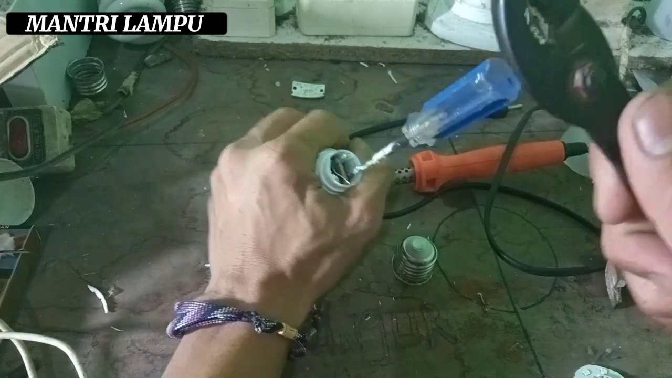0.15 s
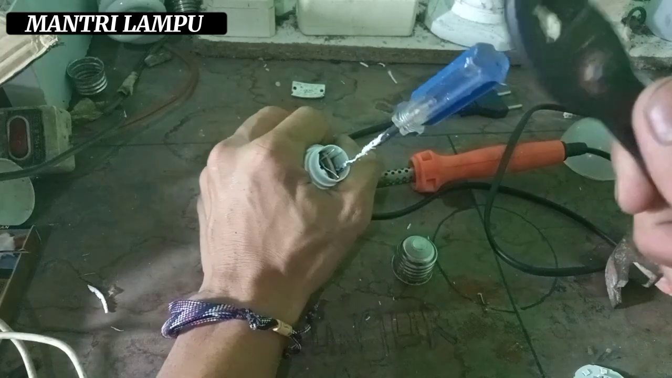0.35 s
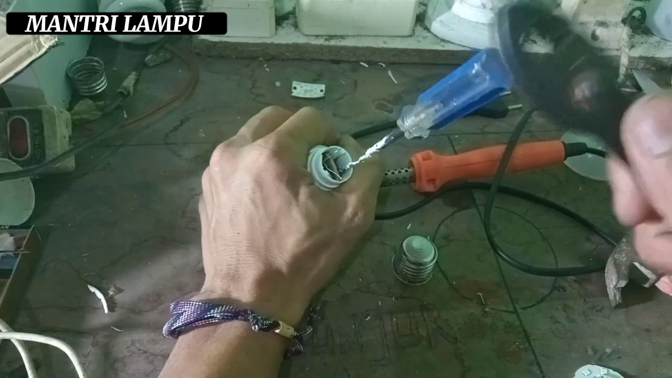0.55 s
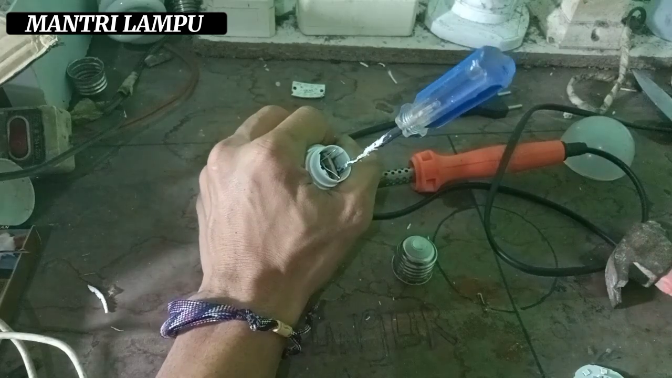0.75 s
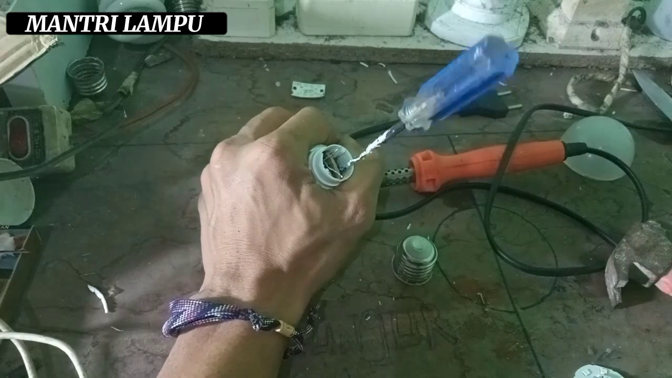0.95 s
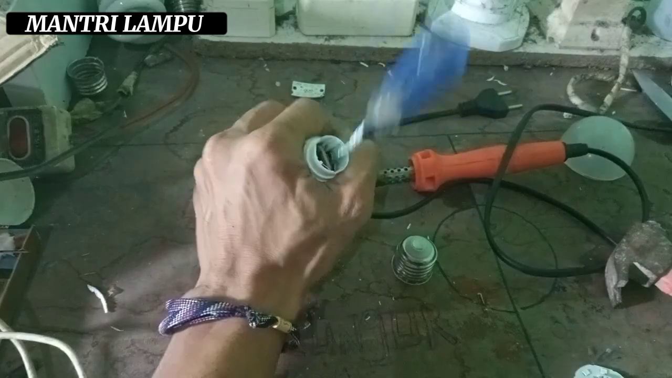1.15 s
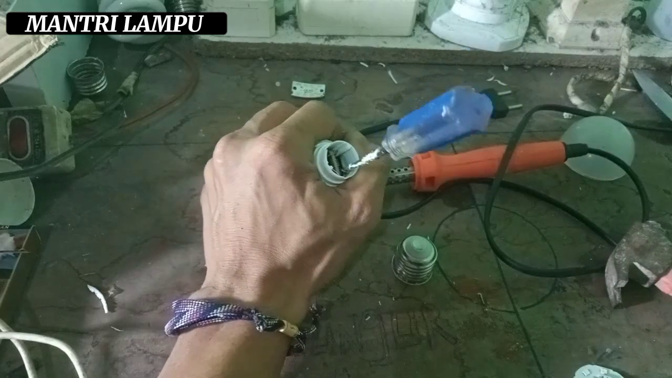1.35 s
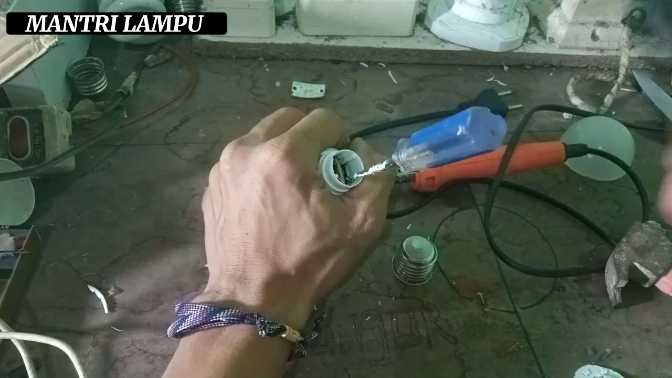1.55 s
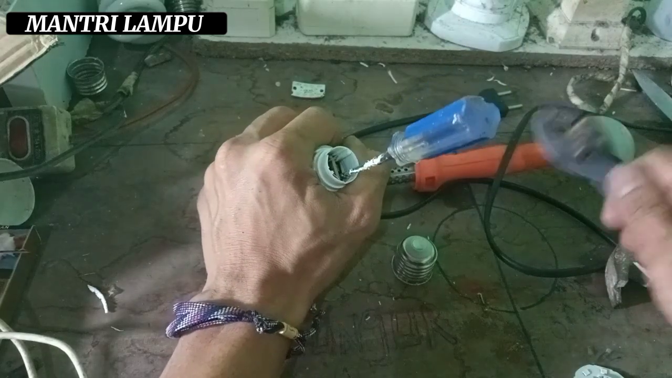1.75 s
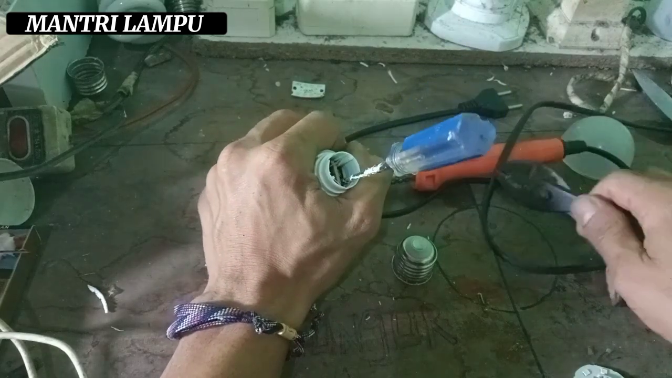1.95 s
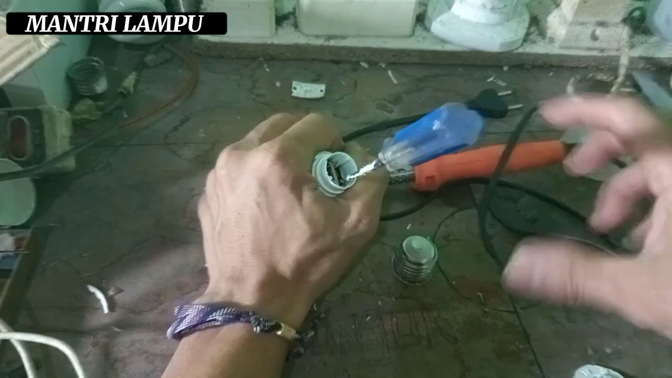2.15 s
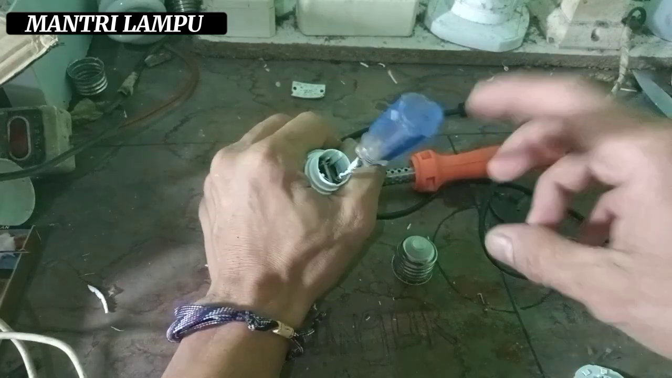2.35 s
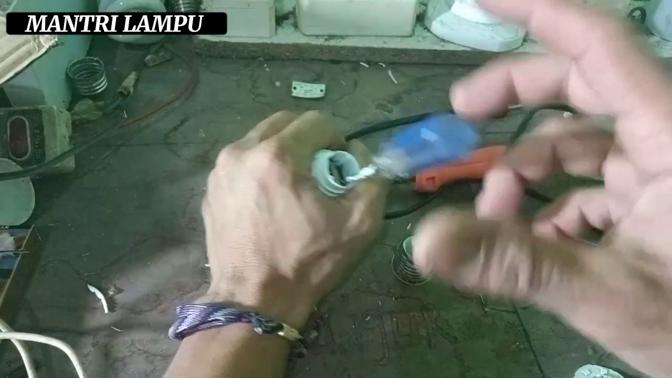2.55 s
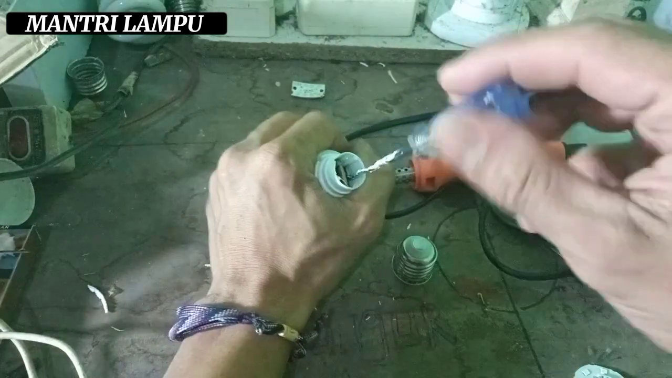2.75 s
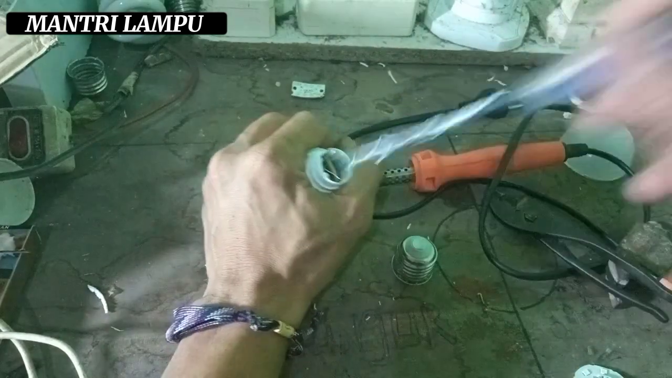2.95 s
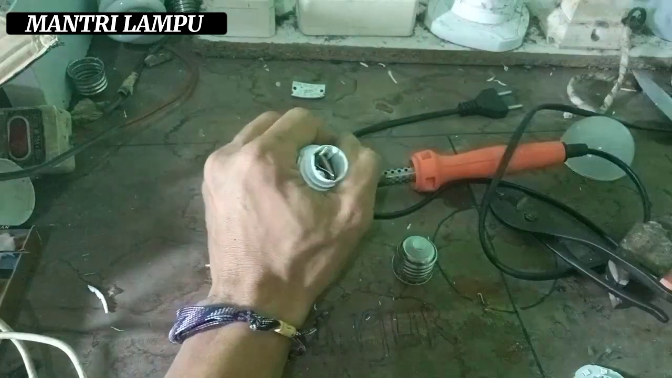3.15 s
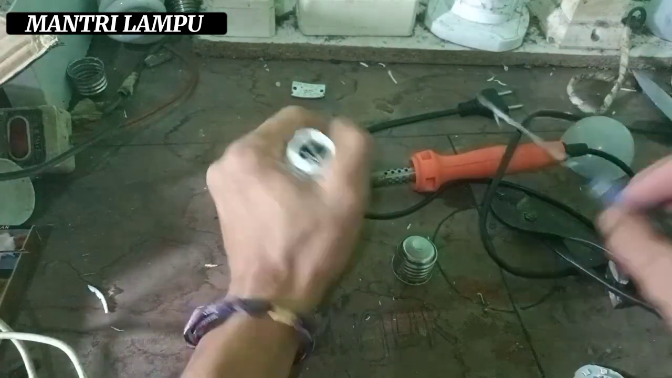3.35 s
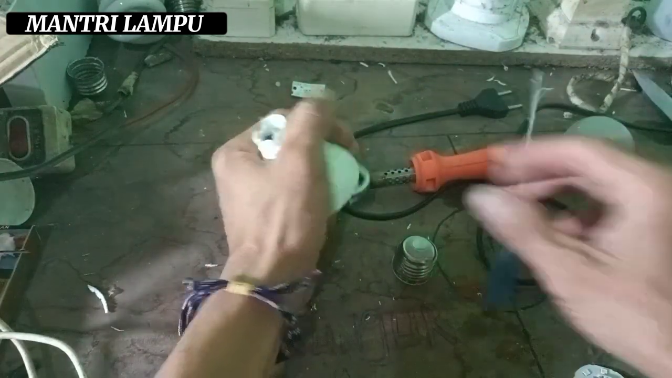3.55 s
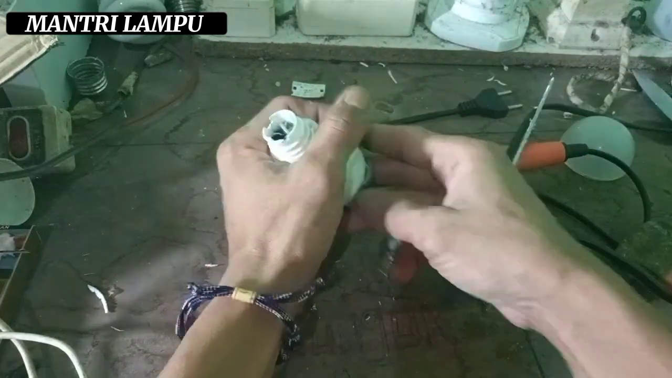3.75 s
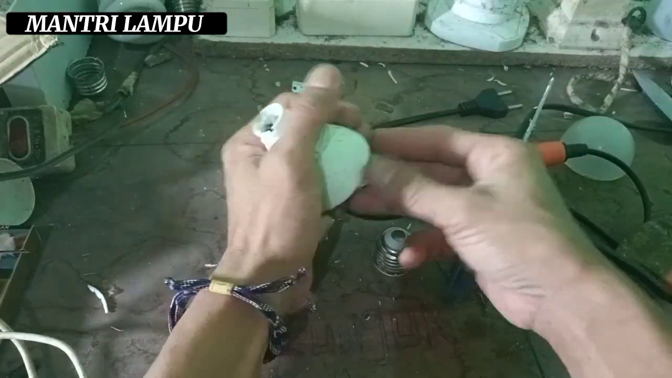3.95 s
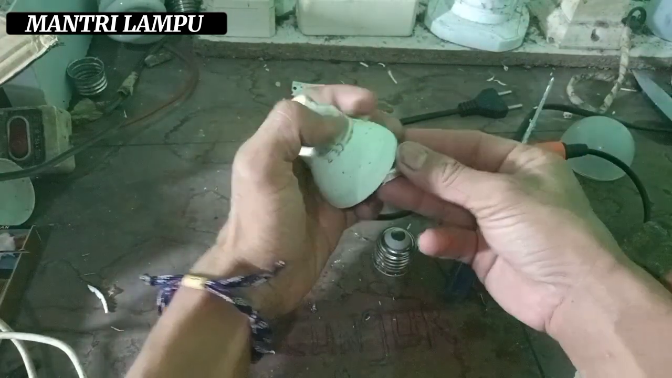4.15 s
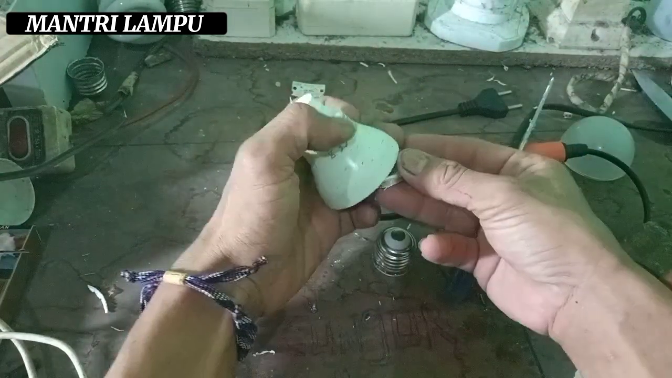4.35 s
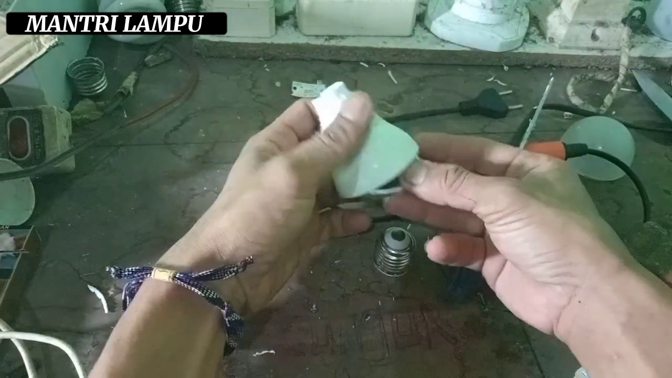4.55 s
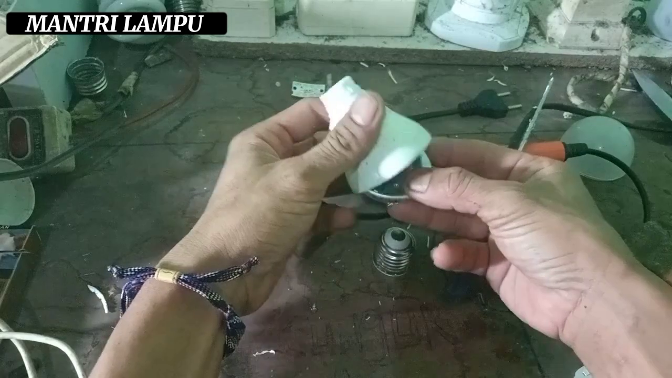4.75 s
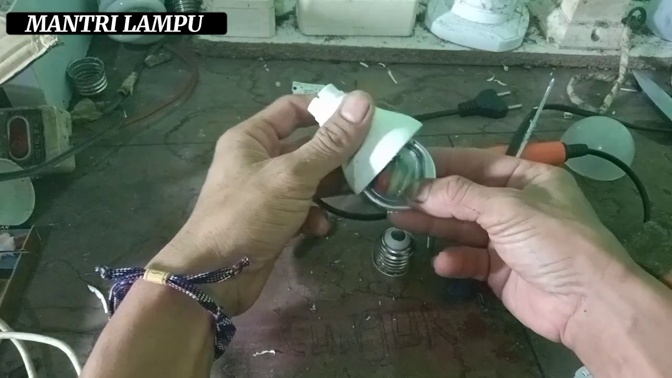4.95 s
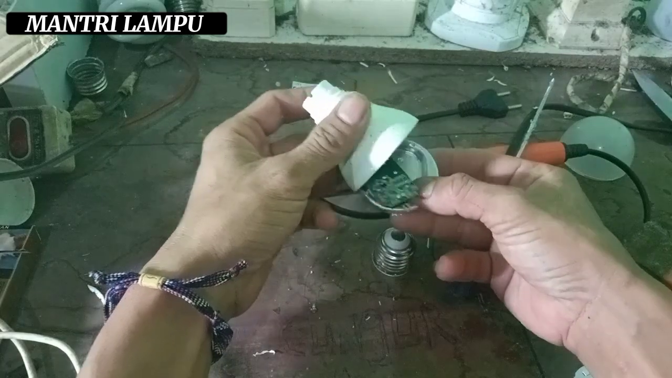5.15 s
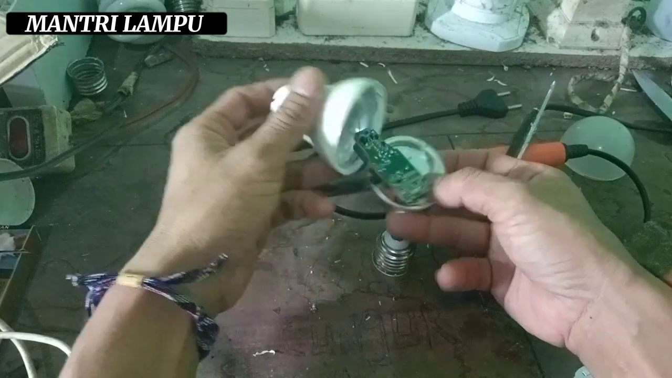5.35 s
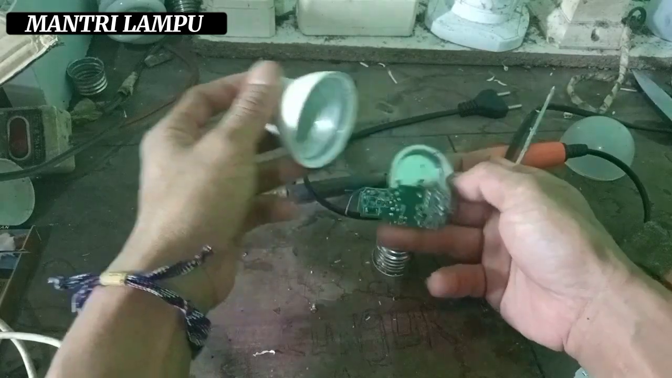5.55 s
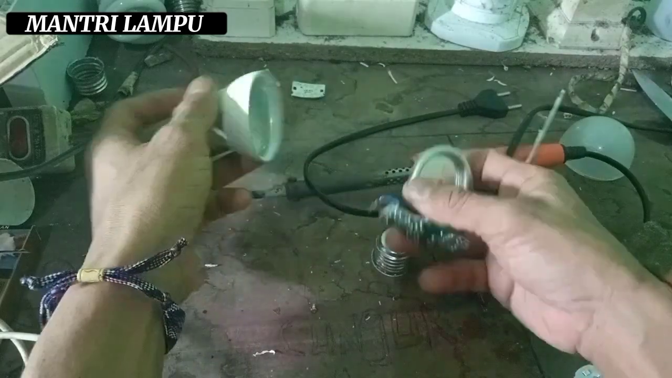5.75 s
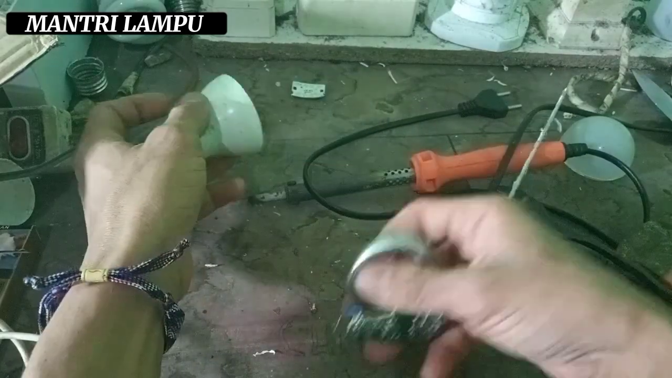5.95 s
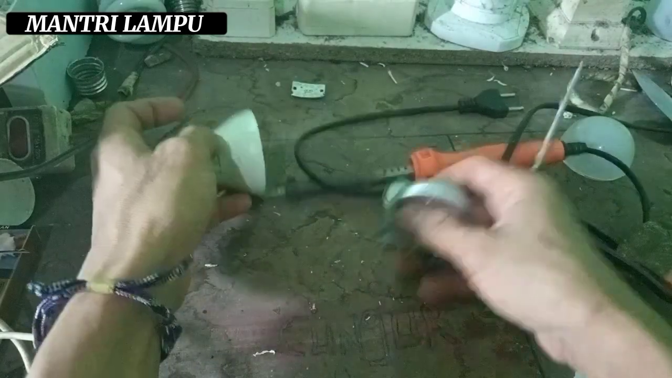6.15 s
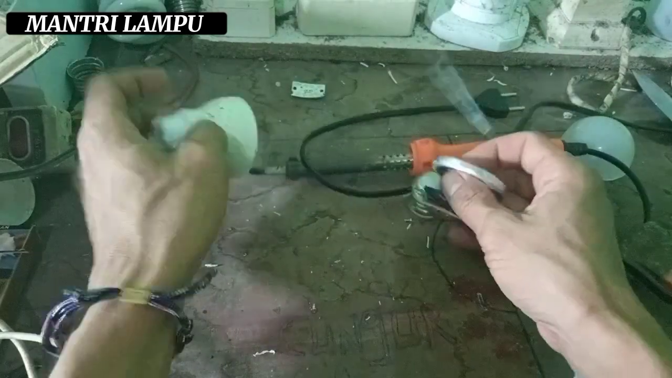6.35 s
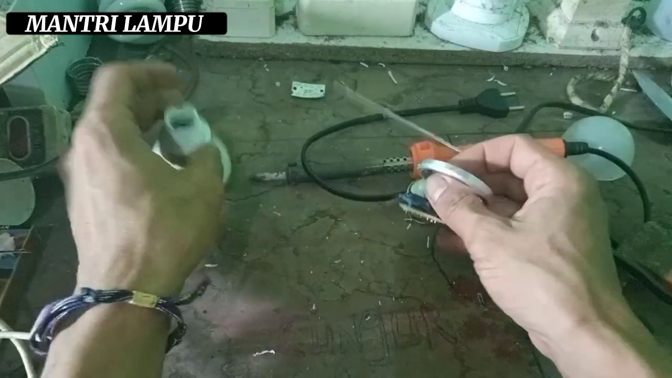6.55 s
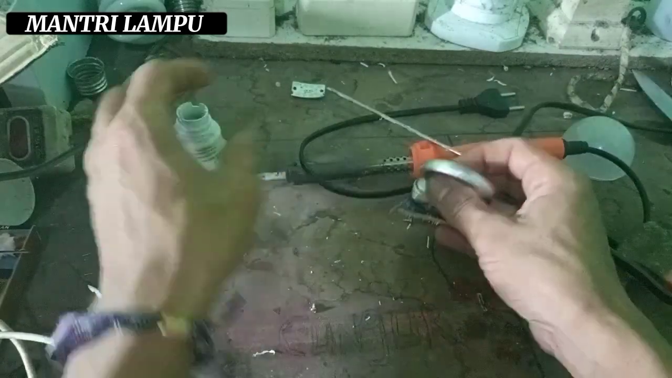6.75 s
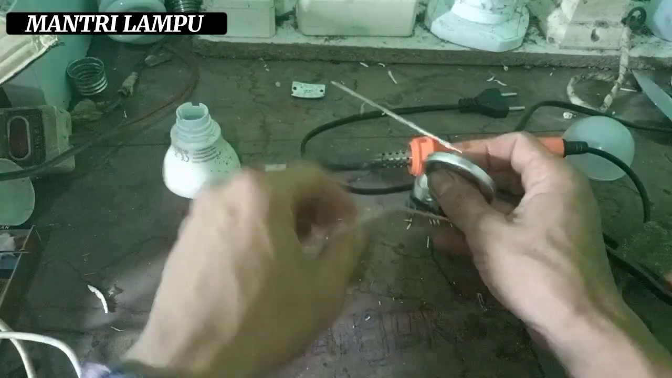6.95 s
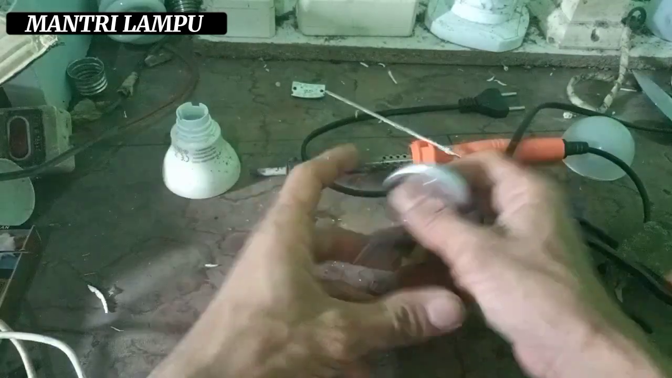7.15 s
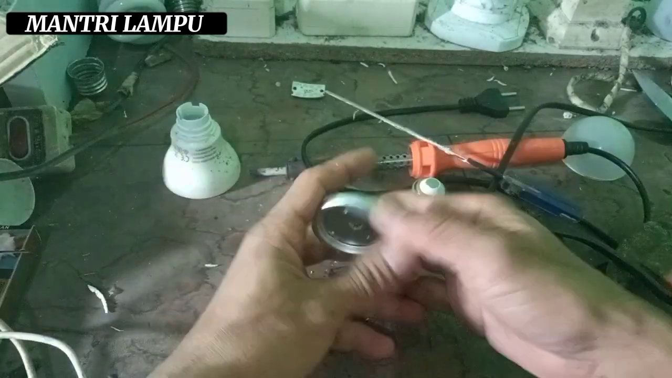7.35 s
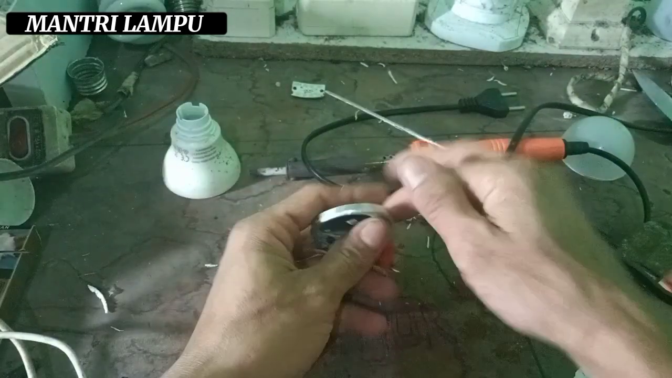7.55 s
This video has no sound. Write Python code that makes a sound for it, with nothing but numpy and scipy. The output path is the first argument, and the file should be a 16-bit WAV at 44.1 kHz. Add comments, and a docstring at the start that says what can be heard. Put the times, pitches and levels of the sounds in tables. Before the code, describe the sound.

A quiet room holds a wavering low hum, soft patchy noise and very faint high insects throbbing about eight times a second. A light metallic tap comes at 0.6 seconds, then a very hard, dull, dry double knock at 1.05. After a pause, a bench thump at 2.0 leads into loud, bright pliers clatter until 2.25. From 2.7 to 3.05 a screwdriver leaves the cap with faint scratchy ticks. Between 3.4 and 3.8 tools clatter and slide on wood, ending in a singing shaft. Small plate clicks and rubs run 4.1 to 5.6, brightest near 5.05. From 5.75 parts knock, roll and clink; shell clacks peak loudest at 6.6, with sliding, easing by 7.1. Tiny board taps finish from 7.3 to 7.5. Close, bright microphone, short room echo.

```python
"""A wooden workbench in a room: a lamp is taken apart. A screwdriver is knocked into the cap and pulled out, pliers
and screwdriver are dropped, an aluminium plate is pried from the plastic shell, parts are slid and set down.
Each blow is a short crackle of noise plus ringing sines; slides are showers of tiny clicks. Filtered noise makes
a wavering hum, room noise, throbbing insects and a faint tone. A limiter ducks before the hardest blows."""
import sys
import numpy as np
from scipy import signal
from scipy.io import wavfile
from scipy.ndimage import uniform_filter1d, minimum_filter1d

SR = 44100
rng = np.random.default_rng(int(sys.argv[2]) if len(sys.argv) > 2 else 0)


def log_audio(samples):
    """Write samples as a 16-bit WAV file to the path given in sys.argv[1]."""
    # one column per channel
    frames = np.atleast_2d(samples).T
    # limit to full scale, then quantise
    limited = np.clip(frames, -1, 1)
    pcm = np.round(limited * 32767).astype(np.int16)
    wavfile.write(sys.argv[1], SR, pcm)


N = 334278   # length in samples
CUTOFF_HZ = 16250   # top of the sound


def from_db(db):
    """Turn decibels into a plain gain factor."""
    return 10 ** (np.asarray(db) / 20)


def rms_one(x):
    """Scale a signal so that its rms, its average strength, is 1."""
    return x / np.sqrt(np.mean(x ** 2) + 1e-20)


def at_hz(points, hz):
    """Read a curve between its (f/Hz, value) points, on a logarithmic pitch scale."""
    points = np.array(points)
    return np.interp(np.log(hz), np.log(points[:, 0]), points[:, 1])


def band(x, low_hz, high_hz):
    """Keep only the sound between two frequencies."""
    return signal.sosfilt(signal.butter(2, [low_hz, high_hz], "band", fs=SR, output="sos"), x)


def drift(rate_hz):
    """Slow chance wandering of spread 1: smoothed noise, worked out at every 40th sample."""
    r = np.exp(-80 * np.pi * rate_hz / SR)
    steps = rng.standard_normal(N // 40 + 2002)
    slow = signal.lfilter([1], [1, -2 * r, r * r], steps)[2000:]   # drop the start-up
    return np.interp(np.arange(N) / 40, np.arange(len(slow)), rms_one(slow))


def ring(clicks, hz, t60):
    """A resonance: a unit click starts a sine of height about 1 that falls by 60 dB in t60 seconds."""
    r = from_db(-60 / (t60 * SR))
    w = 2 * np.pi * hz / SR
    return signal.lfilter([0, np.sin(w)], [1, -2 * r * np.cos(w), r * r], clicks + 1e-18)


def narrow_noise(hz, width_hz):
    """Noise ringing in one resonance, a wavering tone of rms 1; a narrower one rings longer."""
    t60 = np.log(1000) / (np.pi * width_hz)
    return rms_one(ring(rng.standard_normal(N), hz, t60))


def swells(start_s, length_s, level_db, rise_db_per_s, fall_db_per_s):
    """Gain of movements that rise before their start, hold their level and fall after their end."""
    t = np.arange(0, N, 32)[:, None] / SR
    rise_db = rise_db_per_s * (t - start_s)
    fall_db = fall_db_per_s * (start_s + length_s - t)
    db = level_db + np.minimum(0, np.minimum(rise_db, fall_db))
    return np.interp(np.arange(N) / SR, t[:, 0], from_db(db).sum(axis=1))


def room_noise():
    """Patchy room noise: bands of noise with set loudness, each wandering slowly on its own."""
    # spectrum before the whole is scaled: f/Hz, relative level per Hz/dB
    spectrum = [(15, -63), (25, -53.5), (108, -1.5), (130, -8), (170, -8.5), (373, -18), (463, -16),
                (659, -31.5), (1070, -23), (1370, -25.5), (3920, -37.5), (4870, -103), (7110, -40),
                (7920, -41.5), (16000, -53)]
    level_db, patchy_db = -49, 1.8
    noise = 0
    edges = np.geomspace(22, 17000, 25)
    white = rng.standard_normal((2, N))
    for k, (low, high) in enumerate(zip(edges, edges[1:])):
        band_db = at_hz(spectrum, np.sqrt(low * high)) + patchy_db * drift(2.95)
        noise = noise + from_db(band_db) * band(white[k % 2], low, high)   # neighbours use different noise
    return from_db(level_db) * rms_one(noise)


def hum():
    """A low hum wavers because it is noise in a narrow resonance."""
    return from_db(-48.5) * narrow_noise(106, 19)


def insects():
    """High narrow noise throbs about eight times a second, a little unevenly."""
    throbs_per_s, throb_db = 8.0, 6
    phase = 2 * np.pi * throbs_per_s * np.arange(N) / SR + 2 * drift(1.0)
    throb = from_db(throb_db * np.sin(phase))
    return from_db(-74) * throb * narrow_noise(8050, 280)


def far_tone():
    """A faint tone, noise in a narrow resonance, comes and goes."""
    # when it is heard: t/s, length/s, level/dB
    tones = [(0.01, .04, -61), (.43, .06, -62), (0.74, .06, -55.5), (0.942, 0.045, -53), (2.51, 0.028, -58)]
    edge_db_per_s = 504
    gain = swells(*np.transpose(tones), edge_db_per_s, edge_db_per_s)
    return gain * narrow_noise(1060, 25)


def sliding():
    """Rough surfaces catch and slip: uneven grains, coarse in the bass and fine in the treble."""
    # parts slide, rub and scrape: t/s, length/s, level/dB,
    # brightness/dB (upper ranges against the lowest)
    strokes = [(2.227, 0.079, -32.5, -10), (2.707, 0.14, -59.5, -1), (2.923, 0.08, -59, 17),
               (3.456, 0.063, -31.5, -10.5), (3.62, 0.19, -33, -46), (4.513, 0.22, -57.5, -5),
               (4.804, 0.21, -53, -9), (5.06, 0.096, -60, -3), (5.436, 0.057, -46, -12),
               (5.854, 0.11, -35.5, -22), (6.078, 0.1, -31.5, -9), (6.223, 0.099, -30, -19.5),
               (6.441, 0.13, -36, -23), (6.645, 0.12, -29, -48), (6.826, 0.12, -44.5, -20),
               (7.057, 0.076, -40, 1.5), (7.13, 0.087, -54, 10)]
    # the three ranges of the rubbing: low f/Hz, high f/Hz, average grains per s before the unevenness
    ranges = [(219, 1730, 900), (2040, 4310, 2500), (5300, 12500, 8300)]
    rise_db, fall_db = 69, 48   # in the time of one stroke length
    hiss_db = -14   # added in the top range
    out = 0
    unevenness = drift(30)
    start_s, length_s, level_db, brightness_db = np.transpose(strokes)
    shares_db = [0, brightness_db, brightness_db + hiss_db]
    for share_db, (low_hz, high_hz, per_s) in zip(shares_db, ranges):
        gain = swells(start_s, length_s, level_db + share_db, rise_db / length_s, fall_db / length_s)
        sizes = from_db(1.8 * np.minimum(rng.exponential(1, N), 5)) * rng.choice([-1, 1], N)
        chance = per_s * from_db(3.0 * unevenness) / SR
        grains = sizes * (rng.random(N) < chance)
        rubbing = rms_one(band(grains, low_hz, high_hz))
        out = out + band(gain * rubbing, low_hz, high_hz)
    return out


def rolling_shaft():
    """The loose screwdriver shaft sings while it rolls: noise in one narrow resonance."""
    # rolls: t/s, length/s, level/dB
    rolls = [(3.779, 0.023, -27.5), (5.904, 0.063, -35), (6.013, 0.0043, -29), (6.084, .07, -37.5)]
    rise_db_per_s, fall_db_per_s = 2507, 1492
    gain = swells(*np.transpose(rolls), rise_db_per_s, fall_db_per_s)
    return gain * narrow_noise(3470, 45)


def blows(table, modes, contact_s, tick_db, sizzle_db, rings_db, damping=1):
    """Each blow cracks in four ranges and sets the modes, an object's own tones, ringing as hard as it
    strikes their range; a firm grip damps the crack. Weight sets the bass and hardness the treble."""
    # ranges of the contact noise: low f/Hz, high f/Hz, level/dB against the blow, t60/s at damping 1
    crack_ranges = [(96, 710, 0.5, 0.054), (659.7, 3040, -9, 0.052), (2470, 4320, -9.5, 0.024),
                    (6340, 16000, -11.5, 0.027)]
    scatter_db, rattle_db, rattle_hz = 2.0, 3.5, 90
    s, strength_db, weight_db, *treble_db = np.transpose(table)
    out = np.zeros(N)
    at = np.round(s * SR).astype(int)
    # thud, knock, tick, sizzle; without a top treble column, hardness sets the sizzle too
    shares_db = [weight_db, 0, treble_db[0] + tick_db, treble_db[-1] + sizzle_db]
    tops = [low for low, *_ in crack_ranges[1:]] + [CUTOFF_HZ]
    contact = np.hanning(int(contact_s * SR) + 3)   # the force swells and fades over the contact
    # loose parts make the ringing uneven
    rattles = [from_db(rattle_db * drift(rattle_hz)) for _ in range(3)]
    for k, (low_hz, high_hz, crack_db, crack_t60) in enumerate(crack_ranges):
        clicks = np.zeros(N)
        clicks[at] = from_db(strength_db + shares_db[k])
        decay = from_db(-60 * damping / (crack_t60 * SR))
        dying = signal.lfilter([1], [1, -decay], clicks + 1e-18)
        dying = signal.oaconvolve(dying, contact / contact.sum())[:N]
        noise = band(rng.standard_normal(N), low_hz, high_hz)
        noise /= np.sqrt(uniform_filter1d(noise ** 2, int(2 * SR / low_hz)) + 1e-12)   # an even crackle
        crack = from_db(crack_db) * dying * noise
        chatter = contact * rng.choice([-1, 1], len(contact))   # rough faces strike many times
        for j, (hz, level_db, t60) in enumerate(modes):
            if low_hz <= hz < tops[k]:
                struck = clicks.copy()
                chance_db = scatter_db * rng.standard_normal(len(at))
                struck[at] *= from_db(level_db + rings_db + chance_db)
                # how strongly the chatter drives this tone, kept from getting too small to divide by
                turns = np.exp(2j * np.pi * hz / SR * np.arange(len(chatter)))
                reach = max(np.abs(chatter @ turns), .5 * np.linalg.norm(chatter))
                force = signal.oaconvolve(struck, chatter / reach)[:N]
                crack += rattles[j % len(rattles)] * ring(force, hz, t60)
        out += band(crack, low_hz, tops[k])   # little sound outside the range
    return out


def bench_blows():
    """The wooden bench answers with mostly low and middle tones."""
    # blows: t/s, strength/dB, weight/dB, hardness/dB
    hits = [(1.993, -48.5, 18.5, -3), (2.03, -19.5, 6.5, -46), (3.403, -42.5, 15, -16),
            (3.511, -22, 0, -13), (3.523, -20, -3.5, -7), (3.57, -35.5, 7, 4.5), (3.615, -12, -10.5, -33),
            (3.649, -24.5, -1, -36), (3.67, -8.5, -14, -46), (3.714, -10.5, -21, -44),
            (3.777, -16, -43, -9), (4.794, -34.5, -7, -30), (5.609, -45.5, 12, -17), (5.794, -25, -6, -6),
            (5.845, -7, -5, -45), (6.067, -16, -23, 4), (6.233, -20, -4, -24), (6.249, -8.5, -13.5, -21),
            (6.268, -17, -14, -5), (6.428, -24, -3, -14), (6.457, -15.5, -2.5, -5), (6.485, -30.5, 11, -31),
            (7.044, -26.5, 3.5, -21)]
    # modes before rings_db and scatter: f/Hz, level/dB against the blow, t60/s
    modes = [(128, 12, 0.014), (315.7, -5.5, 0.22), (364, 2, 0.18), (658.6, 0.5, 0.16), (945, -1.5, 0.076),
             (1055, -4, 0.079), (1433, -15, 0.046), (1552, -17, 0.25), (1936, -10, 0.082), (2532, 4, 0.082),
             (2850, 13, 0.034)]
    return blows(hits, modes, contact_s=0.0032, tick_db=-16, sizzle_db=-22, rings_db=-8.5)


def board_blows():
    """The board gives light taps with a few middle and high tones."""
    # blows: t/s, strength/dB, weight/dB, hardness/dB
    hits = [(7.301, -22, -38, 5), (7.312, -32, -32, 6.5), (7.372, -34, -36, -16), (7.421, -32.5, -24, -3),
            (7.52, -30.5, -32, -11.5)]
    # modes before rings_db and scatter: f/Hz, level/dB against the blow, t60/s
    modes = [(2084, -3, 0.046), (2555, -5.5, 0.066), (4840, -19, 0.059), (5125, -6, 0.11)]
    return blows(hits, modes, contact_s=0.0025, tick_db=1.5, sizzle_db=-17, rings_db=-11.5)


def cap_contacts():
    """The cap is tapped, then catches and slips as the screwdriver is pulled out: soft scrapes, short tones."""
    # taps and slips: t/s, strength/dB, weight/dB, hardness/dB, top treble/dB
    contacts = [(0.598, -14.5, -24, -4.5, -12), (0.68, -40, -4, 1, 6.5), (2.696, -39, -19, -7, -1),
                (2.715, -33.5, -26, -15, -12), (2.788, -39, -7, -32, -25), (2.801, -42, -4, -3, -26),
                (2.914, -28, -37, -6, -24), (2.923, -29.5, -35, -4.5, -28), (2.953, -38, -24, -6, 7),
                (2.981, -29.5, -32, 5, 6.5), (3.02, -33.5, -18, 8, 5), (3.041, -32.5, -35, 3.5, 8.5),
                (3.056, -43, -27, 7, 11)]
    # modes before rings_db and scatter: f/Hz, level/dB against the contact, t60/s
    modes = [(2085, 1, 0.055), (3605, -4.5, 0.022), (5200, -11, 0.019), (8240, 0, 0.013)]
    return blows(contacts, modes, contact_s=0.005, tick_db=6.5, sizzle_db=-2, rings_db=-5.5, damping=0.77)


def plate_blows():
    """The aluminium plate, held now tightly and now loosely, rings more or less freely at each blow."""
    # blows: t/s, strength/dB, weight/dB, hardness/dB, top treble/dB, freedom to ring/dB
    hits = np.array([(4.132, -35.5, -21, -13, -22, -10.5), (4.423, -35, -19, -32, -15, -10.5),
                     (4.512, -39, -19, 11, -3, -2.5), (4.522, -31.5, -20, 6.5, -10, -5.5),
                     (4.544, -20, -20, -26, -22, -8.5), (4.667, -31, -17, -11, -19, -12.5),
                     (4.708, -36, -22, -2.5, -17, -12), (4.873, -27.5, -10.5, -14, -26, -11),
                     (4.893, -35, -9, 9.5, -19, -3), (4.974, -46, 11, -12, 4, -14),
                     (5.045, -24.5, -9.5, 9, 13, -11), (5.07, -27.5, -10, -3.5, 5, 3.5),
                     (5.437, -38, 5, 2, -16, -10.5), (5.461, -28.5, -3, 4, 8.5, -16),
                     (5.473, -30, -6, 1, -22, -22), (5.521, -30.5, -11, 6, -13, -16.5),
                     (5.569, -32, -18, -27, -28, -17)])
    # modes before freedom to ring and scatter: f/Hz, level/dB against the blow, t60/s
    modes = [(2019, 2, .07), (2200, -3, .04), (4430, -3, .035), (4580, -2, .045), (5367, -14, .03),
             (8430, -6, .08), (8710, 0, .07), (9060, -4, .1)]
    return blows(hits[:, :-1], modes, contact_s=0.00175, tick_db=-1, sizzle_db=-4, rings_db=hits[:, -1])


def screwdriver_blows():
    """The screwdriver clinks with a few high tones."""
    # blows: t/s, strength/dB, weight/dB, hardness/dB, top treble/dB
    hits = [(3.358, -39, -1.5, 7, -16), (3.769, -20, -21, -20, -24), (3.804, -18.5, -31, -19, -17),
            (4.004, -39, -7.5, 18, -7), (5.886, -19, -5, -24.5, -25.5), (5.95, -13.5, -24, -19, -33),
            (6.01, -38, -5, 0, 7.5), (6.104, -10.5, -17.5, -15, -26.5), (6.135, -9.5, -19, -8, -28),
            (6.176, -18.5, -14, -16, -12)]
    # modes before rings_db and scatter: f/Hz, level/dB against the blow, t60/s
    modes = [(3490, 0, .07), (8250, -5, .05), (8920, -4, .06), (11400, -10, .05), (13250, -5, .08)]
    return blows(hits, modes, contact_s=0.0033, tick_db=-16.5, sizzle_db=-0.5, rings_db=-2)


def pliers_blows():
    """The pliers clatter with many tones from low to very high."""
    # blows: t/s, strength/dB, weight/dB, hardness/dB, top treble/dB
    hits = [(2.078, -5, -14, -3, -5.5), (2.134, -12.5, 1, 3, -5), (2.155, 4.5, -5, 4.5, -17.5),
            (2.171, -20, -18, 3, -2), (2.221, 0, -20, -23, -27.5), (3.446, -6.5, -19, -2, -11),
            (6.309, -23, -1.5, -4, -12)]
    # modes before rings_db and scatter: f/Hz, level/dB against the blow, t60/s
    modes = [(310, 5, .08), (560, 2, .05), (850, 0, .035), (1050, 0, .035), (2132, -5, .03),
             (3500, 4, .025), (5440, -13, .09), (5965, -11, .06), (6191, -11, .08), (8995, -7, .11),
             (9249, -4, .09), (9701, -3, .07), (11060, -7, .13), (13090, -4, .08), (13400, -4, .08),
             (14430, -4, .08)]
    return blows(hits, modes, contact_s=0.00276, tick_db=-7, sizzle_db=-2, rings_db=-9.5)


def shell_blows():
    """The plastic shell clacks with short tones over a wide range."""
    # blows: t/s, strength/dB, weight/dB, hardness/dB, top treble/dB
    hits = [(5.759, -25, -11, -23, -34), (5.817, -24, -12, -2.5, -17), (6.334, -15.5, -12, -25, -30),
            (6.39, -36.5, 6, -1, -3), (6.441, -13, -10, -29, -11), (6.531, -23.5, 3, -23, -27),
            (6.546, -15, -6.5, -13, -35), (6.614, 10, -19.5, -30, -33), (6.633, 2, -30, -10.5, -37),
            (6.648, -20, -24, -30, -53), (6.672, -21, -20, -18, -49), (6.69, -4.5, -20.5, -13, -42),
            (6.736, -14, -13, -28, -50), (6.756, -19.5, -3.5, -29, -49), (6.838, -27.5, -8, -20, -22),
            (6.91, -27.5, -15, -23, -30), (7.019, -24, -9, -26, -25), (7.075, -24, -5, 6, -20)]
    # modes before rings_db and scatter: f/Hz, level/dB against the blow, t60/s
    modes = [(426, -0.5, 0.055), (1070, -22, 0.035), (1393, -4, 0.034), (1525, -6, 0.044),
             (1630, -5.5, 0.02), (2015, -6, 0.12), (3500, -12, .04), (4650, 4.5, 0.058), (8900, 2.5, 0.071)]
    return blows(hits, modes, contact_s=0.0016, tick_db=-9.5, sizzle_db=-6, rings_db=-13.5)


def handle_blows():
    """The handle gives a hard, dull double knock whose crack dies quickly."""
    # blows: t/s, strength/dB, weight/dB, hardness/dB
    hits = [(1.0507, 10.4, -10.5, -2.5), (1.0538, 7, 4, 4.5)]
    # modes before rings_db and scatter: f/Hz, level/dB against the blow, t60/s
    modes = [(111, 7, 0.021), (230, 2.5, 0.018), (406, -8, 0.016), (760, 5, 0.0064), (2150, -16, 0.012)]
    return blows(hits, modes, contact_s=0.0016, tick_db=-0.5, sizzle_db=-7, rings_db=-12.5, damping=3.74)


def room(x):
    """Diffuse echo: noise that dies octave by octave, after a short gap."""
    # how long the echo takes to fall by 60 dB: f/Hz, t60/s
    echo_t60 = [(100, 0.52), (500, 0.36), (2000, 0.5), (6000, 0.38), (15000, 0.18)]
    tilt_db = 1.5   # per octave: the echo is thin in the bass
    t = np.arange(SR // 2) / SR
    tail = 0
    for low in 62 * 2. ** np.arange(8):
        octave = band(rng.standard_normal(len(t)), low, 2 * low)
        fading_db = tilt_db * np.log2(low) - 60 * t / at_hz(echo_t60, 1.4 * low)
        tail = tail + octave * from_db(fading_db)
    tail = tail * (t > .004)
    return signal.fftconvolve(x, tail / np.sqrt(np.sum(tail ** 2)))[:N]


def scene():
    """Add up the background, the handled parts and their echo."""
    background = room_noise() + hum() + insects() + far_tone()
    parts = sliding() + rolling_shaft()
    parts = parts + bench_blows() + board_blows() + cap_contacts() + plate_blows()
    parts = parts + screwdriver_blows() + pliers_blows() + shell_blows() + handle_blows()
    room_db = -14.5
    return (background + parts + from_db(room_db) * room(parts))[None]


def record(dry):
    """A small microphone with treble resonances; a limiter ducks ahead of peaks and lets go quickly;
    stray peaks clip; the top is cut."""
    # resonances: f/Hz, sharpness, added gain (a plain factor)
    peaks = [(8400, 6.0, .8), (10200, 5.0, .9), (15200, 6.0, .8)]
    limit_db, look_ahead_s, release_db_per_s = -1.5, 0.022, 383
    clip_at = .89
    boosts = [gain * signal.lfilter(*signal.iirpeak(hz, sharpness, fs=SR), dry)
              for hz, sharpness, gain in peaks]
    dry = dry + sum(boosts)
    dry = signal.sosfilt(signal.butter(3, 52, "high", fs=SR, output="sos"), dry)   # low cut, Hz
    ahead = int(look_ahead_s * SR)
    ramp = release_db_per_s * np.arange(N) / SR
    over_db = np.maximum(20 * np.log10(np.abs(dry[0]) + 1e-9) - limit_db, 0)
    held_db = -minimum_filter1d(-over_db, ahead, origin=-(ahead // 2))   # highest peak just ahead
    released_db = np.maximum.accumulate(held_db + ramp) - ramp   # falls no faster than the release
    gain = from_db(-uniform_filter1d(released_db, ahead // 4))
    clipped = np.clip(dry * gain, -clip_at, clip_at)
    return signal.sosfilt(signal.cheby2(18, 80, CUTOFF_HZ, fs=SR, output="sos"), clipped)


dry = scene()
out = record(dry)
log_audio(out)
```